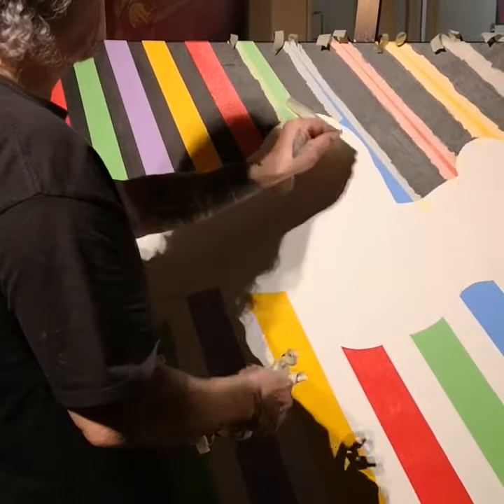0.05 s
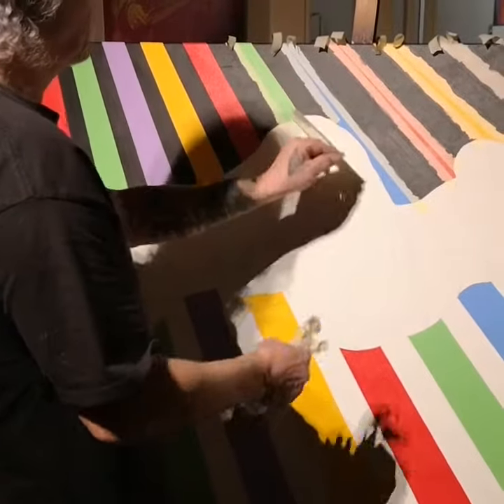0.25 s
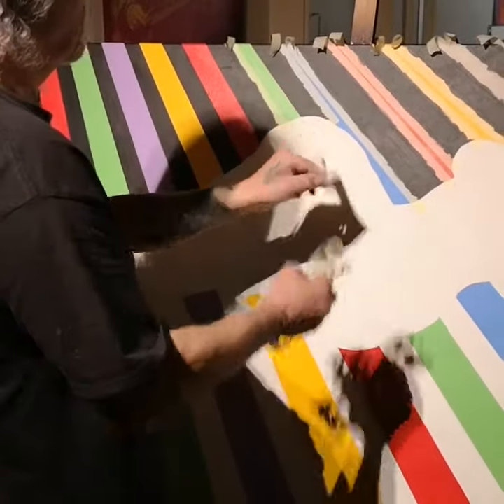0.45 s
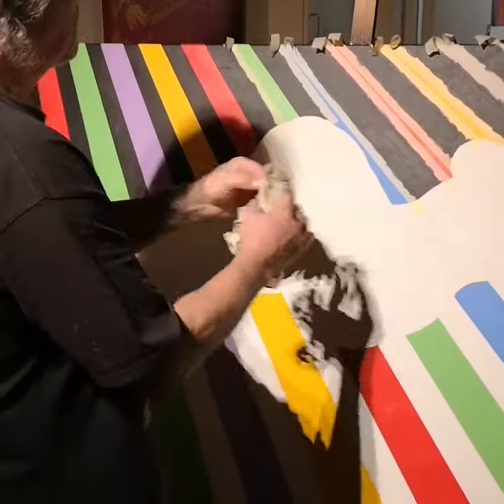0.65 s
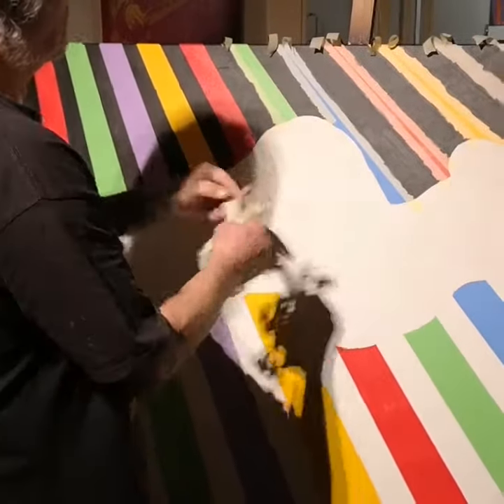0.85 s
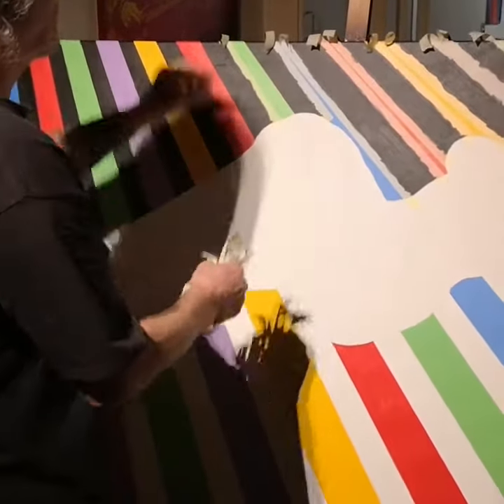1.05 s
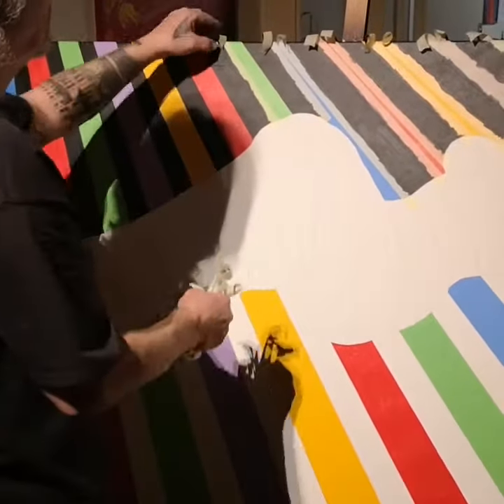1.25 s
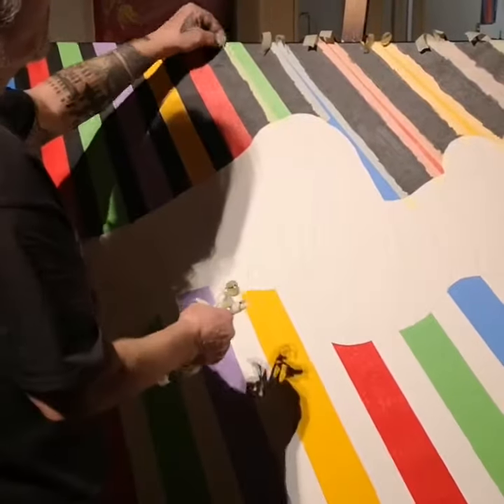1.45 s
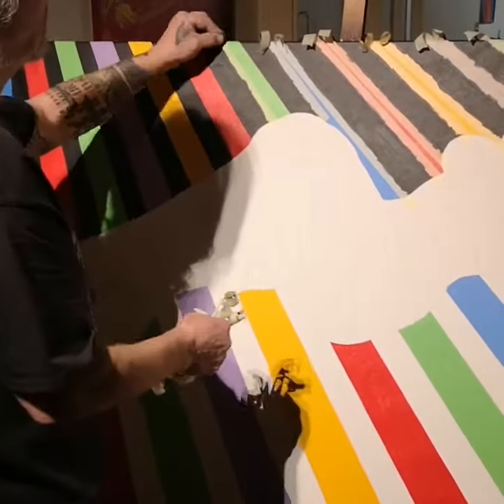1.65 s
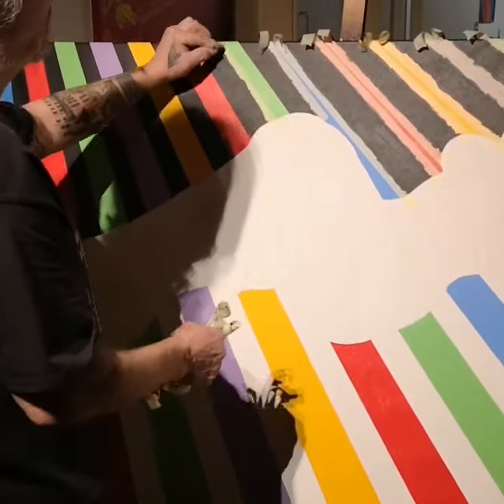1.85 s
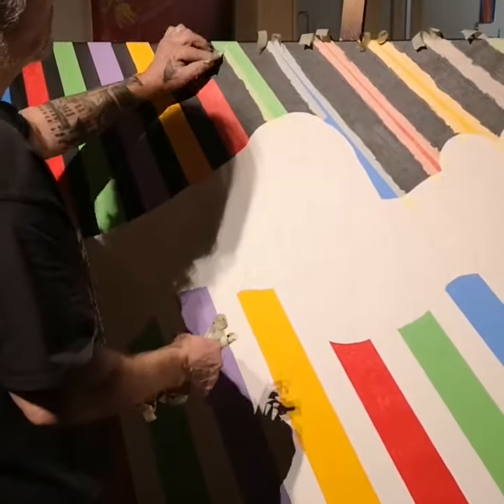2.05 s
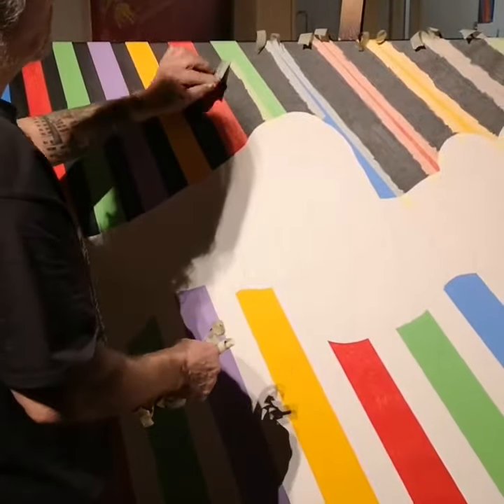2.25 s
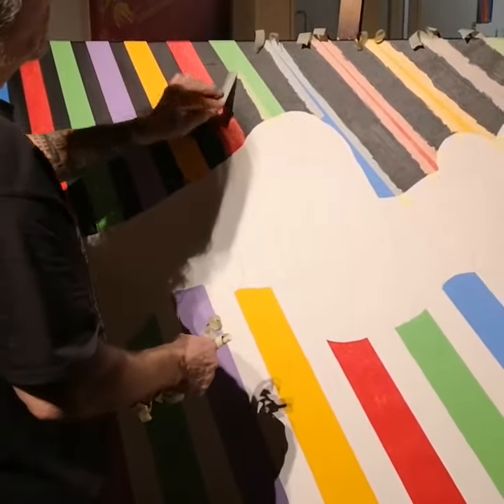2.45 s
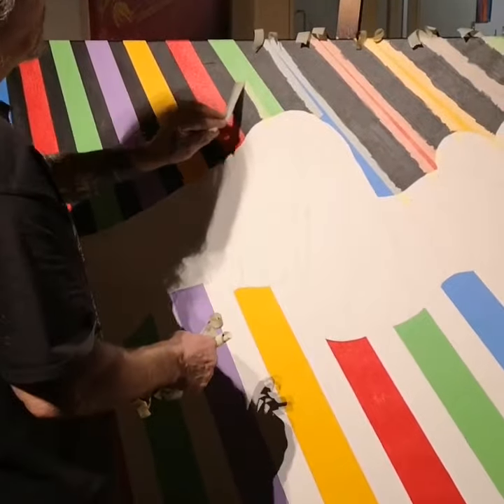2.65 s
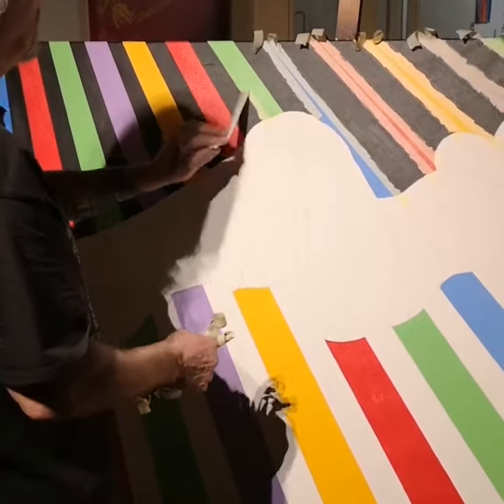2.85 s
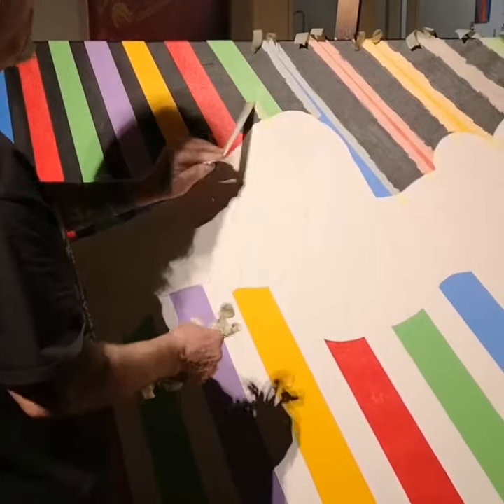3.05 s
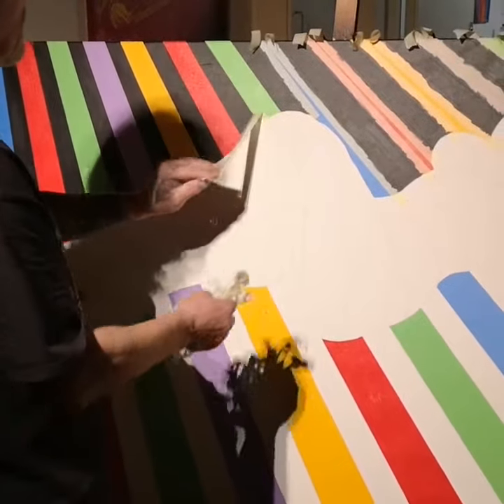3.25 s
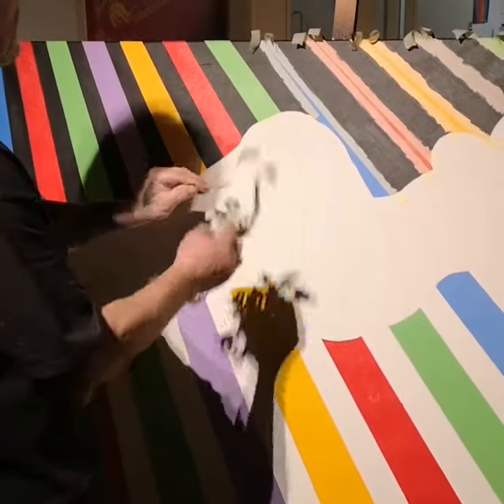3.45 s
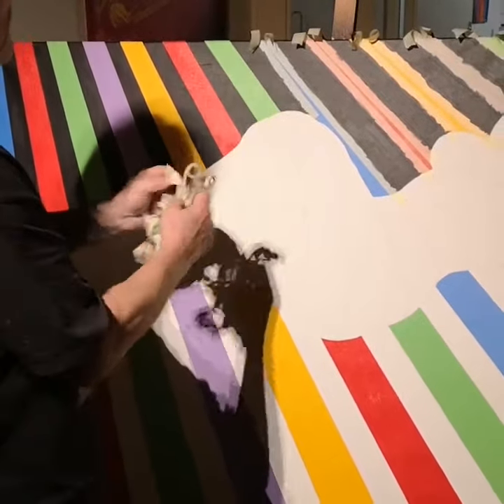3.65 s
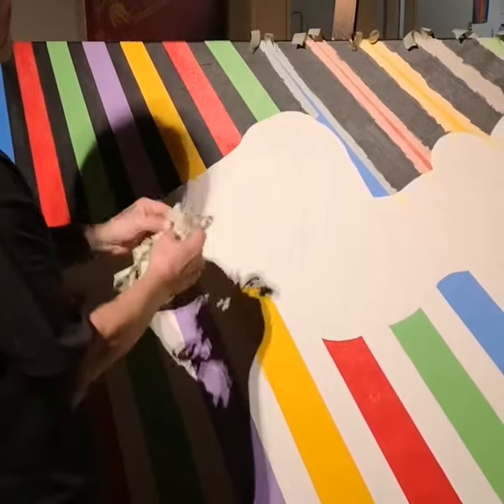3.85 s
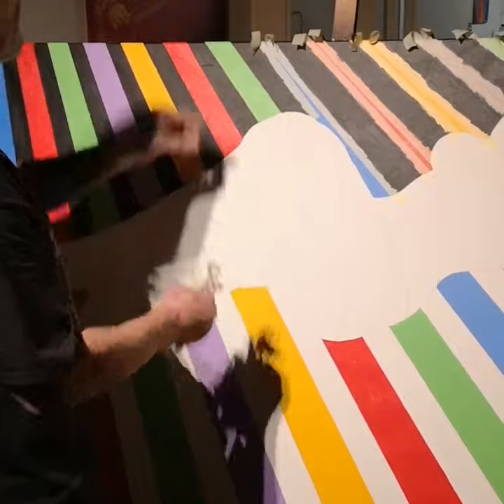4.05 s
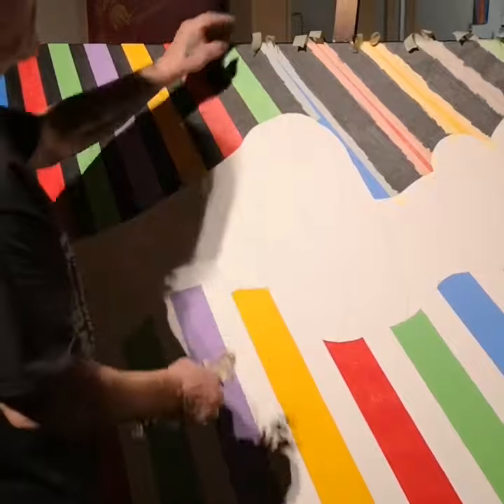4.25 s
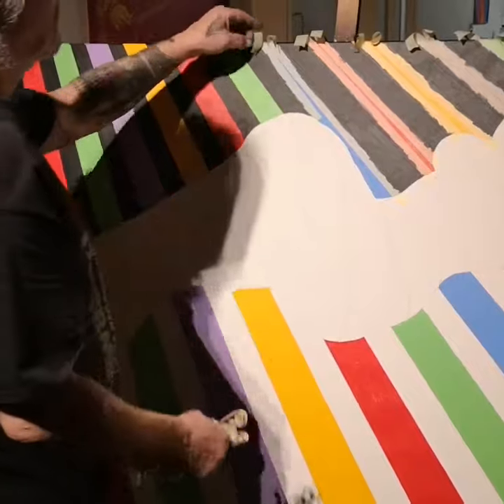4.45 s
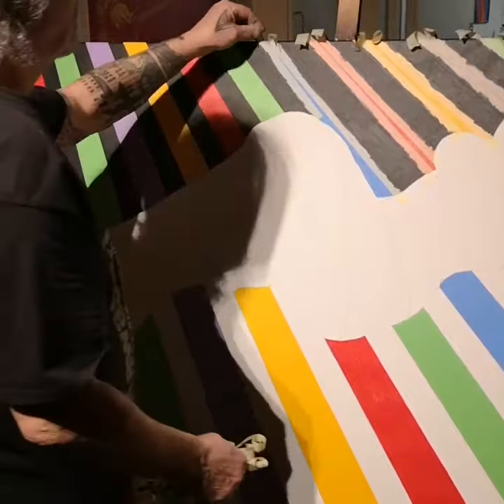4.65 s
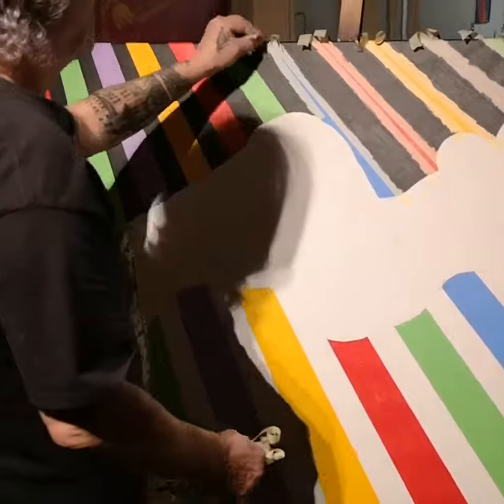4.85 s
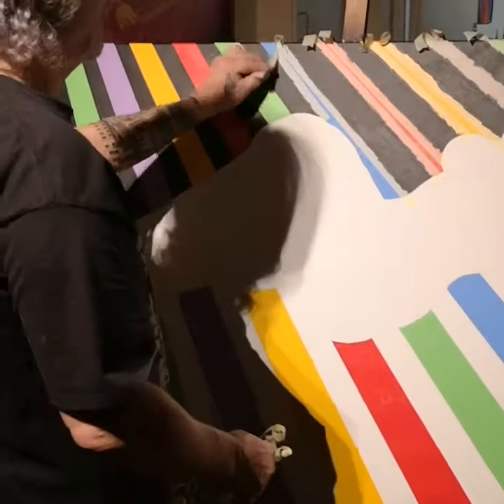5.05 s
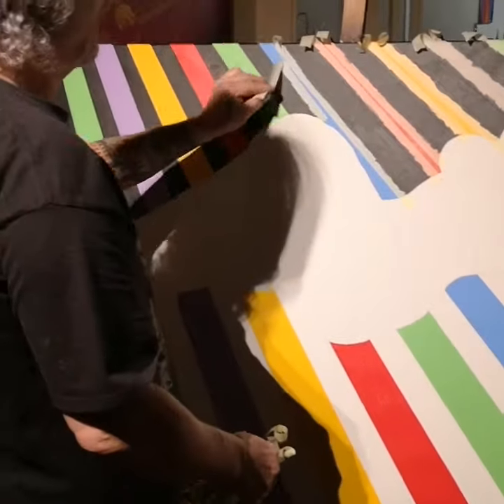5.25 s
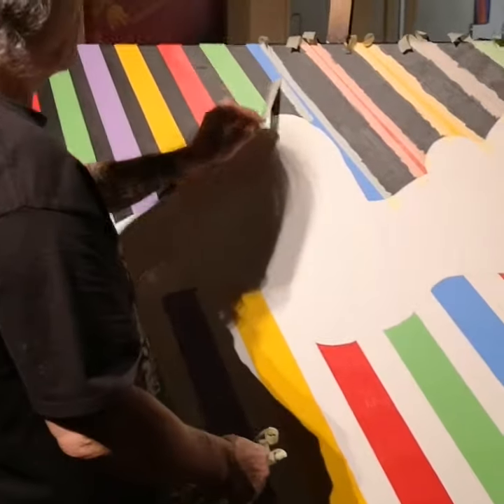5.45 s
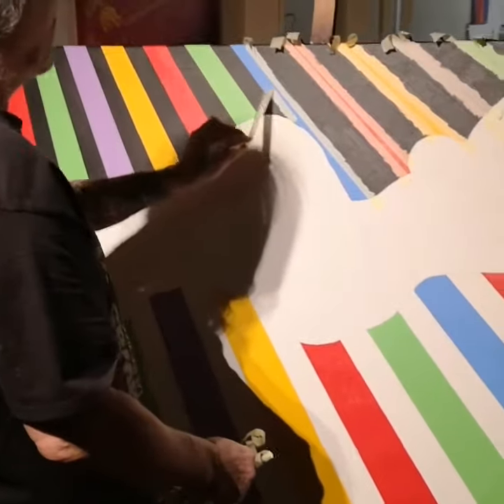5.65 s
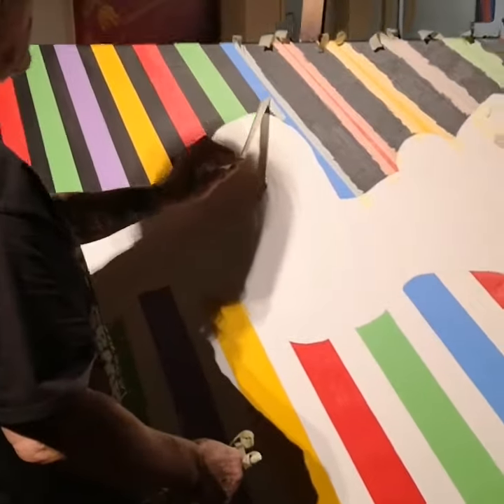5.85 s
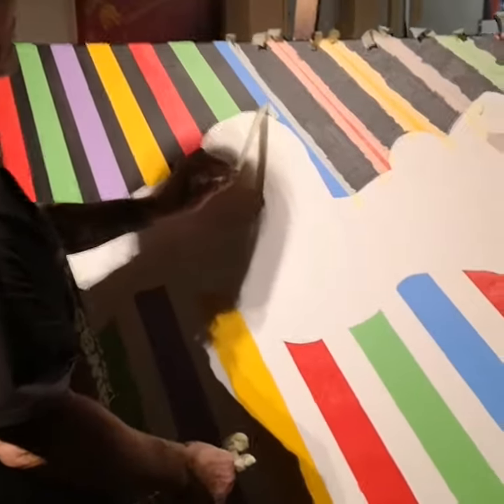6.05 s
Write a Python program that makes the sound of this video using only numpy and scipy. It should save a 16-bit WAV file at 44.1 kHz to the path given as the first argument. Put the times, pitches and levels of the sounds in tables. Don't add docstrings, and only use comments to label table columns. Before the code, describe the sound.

Close, bright tearing of sticky tape from a taut painted canvas, drum-like thumps beneath, paused twice while fingers lightly crumple the loose strips.

```python
import sys
import numpy as np
from scipy import signal
from scipy.io import wavfile
from scipy.ndimage import uniform_filter1d

SR = 44100
rng = np.random.default_rng(int(sys.argv[2]) if len(sys.argv) > 2 else 0)


def dump(signal):
    limited = np.clip(np.atleast_2d(signal).T, -1, 1)
    pcm = np.round(limited * 32767).astype(np.int16)
    wavfile.write(sys.argv[1], SR, pcm)


def natural_amplitude(level_db):
    exponent = np.asarray(level_db, float) / 20
    return 10 ** exponent


N = 269010


def evened(x):
    return x / np.sqrt(np.mean(x ** 2) + 1e-20)


def read(points, hz):
    f, value = np.transpose(points)
    return np.interp(np.log(hz + 1), np.log(f + 1), value)


def colour(x, points):
    gain_db = np.maximum(read(points, abs(np.fft.fftfreq(4096, 1 / SR))), -100)
    log_gain = np.log(natural_amplitude(gain_db))
    taps = np.fft.ifft(np.exp(np.conj(signal.hilbert(log_gain)))).real[:2048]
    return signal.oaconvolve(x, taps)[:len(x)]


def fading(x, fade_s):
    return signal.lfilter([1], [1, -np.exp(-1 / (fade_s * SR))], x)


def resonate(x, hz, width_hz):
    turn = np.exp(2j * np.pi * np.cumsum(hz * np.ones(len(x))) / SR)
    r = np.exp(-np.pi * width_hz / SR)
    return 2 * (turn * signal.lfilter([1 - r], [1, -r], x / turn + 1e-18)).real


def ring(x, modes):
    t = np.arange(SR // 3) / SR
    response = sum(natural_amplitude(db - 60 * t / t60) * np.sin(2 * np.pi * hz * t) for hz, db, t60 in modes)
    return signal.oaconvolve(x, response)[:N]


def per_sample(curve):
    return np.interp(np.arange(N) / 32, np.arange(len(curve)), curve)


def stroke_db(start, swell, length, peak_db, creep_db_s, bite_db, sag_db_s, release_db_s):
    linger_db, linger_db_s = 16, 160
    u = np.arange(0, N + 32, 32) / SR - start[:, None]
    swell, length = np.maximum(swell, 1e-3)[:, None], length[:, None]
    rise = bite_db * np.clip(1 - u / swell, 0, 1) - creep_db_s * np.maximum(-u, 0)
    after = np.maximum(u - length, 0)
    release = np.minimum(release_db_s * after, linger_db + linger_db_s * after)
    fall = sag_db_s * np.maximum(u - swell, 0) + release
    return np.maximum(peak_db[:, None] + rise - fall, -140)


# hz, level_db (per Hz)
AIR_SPECTRUM = [(8.8, -43), (15, 2.5), (32, -6.5), (49, -17), (102, -16), (244, -28), (282, -15),
                (389, -30.5), (505, -35.5), (877, -32), (1440, -35), (1570, -30.5), (1710, -31),
                (6330, -41), (15600, -50.5)]
# hz, likeness (0 to 1)
AIR_LIKENESS = [(60, 0.99), (200, 0.81), (350, 0.19), (520, 0.02), (1000, 0.038), (1400, 0.64),
                (2000, 0.042), (15000, .05)]


def room_tone():
    air_db, fan_db = -63, -84.5
    frames, hz = N // 512 + 6, np.fft.rfftfreq(2048, 1 / SR)
    a, b, c, d, patches = rng.standard_normal((frames, 1025, 5)).T
    patches = evened(uniform_filter1d(uniform_filter1d(patches, 20, 0), 8, 1))
    same = np.clip(read(AIR_LIKENESS, hz), -1, 1)[:, None]
    left = a + 1j * b
    z = np.array([left, same * left + np.sqrt(1 - same ** 2) * (c + 1j * d)])
    z *= natural_amplitude(read(AIR_SPECTRUM, hz)[:, None] + 0.14 * patches)
    air = evened(signal.istft(z, nperseg=2048, noverlap=1536)[1][:, :N])
    fan = evened(resonate(rng.standard_normal(N), 240, width_hz=1.9))
    return natural_amplitude(air_db) * air + natural_amplitude(fan_db) * fan


# start_s, length_s, level_db, pitch_hz
SQUEAKS = [
    (4.98, 0.18, -74.5, 1295),
    (1.05, 0.48, -79, 360),
]


def squeak():
    t, noise = np.arange(N) / SR, rng.standard_normal(N)
    total = np.zeros(N)
    for start, length, level_db, hz in SQUEAKS:
        swell = np.sin(np.pi * np.clip((t - start) / length, 0, 1)) ** .5
        total += natural_amplitude(level_db) * swell * evened(resonate(noise, hz, width_hz=55))
    return total


def clicks(per_s, spread_db):
    return natural_amplitude(spread_db * np.minimum(rng.exponential(1, N), 4)) * (rng.random(N) < per_s / SR)


def stutter(per_s, ms, depth):
    return 1 + depth * evened(fading(clicks(per_s, spread_db=-0.5), ms / 1000))


def glue(snaps):
    threads = evened(clicks(9000, spread_db=2.0) * rng.choice([-1., 1.], N))
    burst = 1 + .9 * evened(fading(snaps, 0.002))
    return threads * stutter(41, ms=13.0, depth=0.12) * burst


# hz, level_db (per Hz)
FIZZ_SPECTRUM = [(2710, -36.5), (4600, -9), (4670, -12.5), (5300, -7.5), (6210, -6.5), (7800, -1.5),
                 (9910, -6), (12500, -23.5), (14500, -17), (15500, -21)]


def glue_fizz(threads):
    return evened(colour(threads, FIZZ_SPECTRUM))


# hz, level_db (per Hz)
STRIP_SPECTRUM = [(600, -41), (1000, -9.5), (1600, -1.5), (2700, 0), (4100, -0.5), (4800, -12), (5600, -3),
                  (7200, -45.5)]


def ringing_strip(threads, strip_hz, ring_db):
    broad = evened(colour(threads, STRIP_SPECTRUM))
    tone = resonate(resonate(broad, strip_hz, width_hz=850), strip_hz, width_hz=850)
    return (broad + natural_amplitude(ring_db) * evened(tone)) / np.sqrt(1 + natural_amplitude(2 * ring_db))


# start_s, length_s, fizz_db, paper_db (over fizz), paper_hz
FLICKS = [(0.82, .005, -67, -4, 2200), (0.828, .01, -61, -17, 2300), (0.896, 0.012, -63.5, -2.5, 2300),
          (0.92, 0.021, -59, 0, 1750), (0.967, 0.022, -63.5, 10, 2700), (0.977, .04, -64.5, -3, 1750),
          (1.226, 0.011, -66.5, -5, 2250), (1.983, 0.094, -50, 0.5, 2940), (3.773, 0.018, -57.5, -8, 2600),
          (3.864, .01, -68, 5, 2600), (3.876, .012, -60, -1, 2600), (3.887, 0.098, -57.5, -2, 2500),
          (4.069, .04, -62, 2, 1920), (4.377, .012, -62.5, 1, 2200)]
# peak_s, length_s, fizz_db, paper_db (over fizz), paper_hz
SQUEEZES = [(1.041, 0.004, -59.5, 2.5, 1840), (1.55, 0.026, -82, -3, 1900), (1.671, .03, -67, -7, 3000),
            (1.704, 0.034, -69.5, -1.5, 3140), (2.12, 0.087, -61.5, -2.5, 3170),
            (4.137, 0.0022, -50, -4, 1740), (4.275, .012, -66, -4, 2980), (4.32, .03, -65, -5.5, 2300),
            (4.389, 0.0089, -56.5, 0.5, 4100), (4.45, .05, -74.5, -10, 3900),
            (4.896, 0.021, -60.5, -6, 3050), (5.195, 0.011, -57, -1.5, 3100)]


def fingers():
    start, length, fizz_db, paper_db, paper_hz = np.transpose(np.concatenate([FLICKS, SQUEEZES]))
    creep_db_s = np.repeat([2500, 480], [len(FLICKS), len(SQUEEZES)])[:, None]
    levels = stroke_db(start, 0 * start, length, fizz_db, creep_db_s,
                       bite_db=0.5, sag_db_s=90, release_db_s=650)
    now = levels.argmax(0)
    return per_sample(natural_amplitude(levels.max(0))), per_sample(paper_db[now]), per_sample(paper_hz[now])


def touches():
    gain, paper_db, paper_hz = fingers()
    creases = clicks(180, spread_db=0.0)
    fizz = glue_fizz(glue(creases))
    paper = ringing_strip(glue(creases), paper_hz, ring_db=-5)
    return gain * (fizz + natural_amplitude(paper_db - .3) * paper)


# start_s, tick_db, spray_db
SLIPS = [(0.257, -34, -34), (0.397, -41, -33), (0.454, -38, -48), (0.818, -50, -66), (0.835, -54, -57),
         (0.9, -50, -62), (0.923, -50, -41), (0.988, -49, -42), (1.041, -39, -45.5), (1.705, -48, -51),
         (1.986, -34, -36.5), (2.19, -33, -56), (3.572, -41, -52), (2.268, -27.5, -31.5), (2.36, -39, -30),
         (2.387, -28, -30), (2.531, -37, -42), (2.767, -45, -54), (2.932, -41, -35), (3.098, -31, -51),
         (3.254, -34, -49), (3.522, -42, -34.5), (3.773, -43.5, -61), (3.889, -34.5, -37.5),
         (4.14, -33.5, -34), (4.381, -39, -54), (5.208, -28, -45), (5.51, -38, -32), (5.777, -35, -41),
         (5.821, -47, -37)]


def slips():
    start, tick_db, spray_db = np.transpose(SLIPS)
    at = np.round(start * SR).astype(int)
    ticks, fizz, paper = np.zeros((3, N))
    ticks[at] = -natural_amplitude(tick_db + 5.0)
    fizz[at] = natural_amplitude(spray_db - 8)
    paper[at] = natural_amplitude(spray_db - 13.5)
    dying = np.exp(-np.arange(2000) / (.005 * SR))
    spray = np.zeros(N)
    for starts, spectrum in ((fizz, FIZZ_SPECTRUM), (paper, STRIP_SPECTRUM)):
        noise = evened(colour(rng.standard_normal(N), spectrum))
        spray += signal.oaconvolve(starts, dying)[:N] * noise
    tick_spectrum = [(300, -22), (1500, -7), (4000, 12.5), (8000, 10), (13000, -12), (16000, -12.0)]
    return spray, colour(ticks, tick_spectrum)


# start_s, swell_s, length_s, fizz_db
FIRST_TUGS = [(0.0, 0.0017, 0.14, -37.5), (0.137, 0.0045, .025, -41.5), (0.162, .004, .02, -40),
              (0.186, 0.0095, 0.056, -40.5), (0.263, .004, 0.025, -44.5), (0.289, 0.0026, 0.025, -46.5),
              (0.334, 0.0063, .04, -48.5), (0.4, .003, 0.037, -56.5), (.455, .003, 0.035, -52),
              (0.491, 0.029, 0.051, -44.5), (0.56, .003, 0.027, -54)]
SECOND_TUGS = [(2.187, .008, .022, -52), (2.215, 0.029, 0.051, -49.5), (2.267, 0.0021, 0.065, -46),
               (2.359, 0.0034, 0.017, -45), (2.387, 0.016, 0.076, -42.5), (2.529, 0.0032, 0.071, -43.5),
               (2.574, 0.007, 0.11, -42.5), (2.685, 0.0077, 0.078, -47), (2.766, .004, 0.1, -47.5),
               (2.813, 0.017, 0.078, -43.5), (2.931, 0.003, 0.078, -50), (3.023, 0.0063, 0.052, -49.5),
               (3.097, .004, 0.051, -48.5), (3.14, 0.0081, 0.13, -47), (3.254, .004, 0.084, -46.5),
               (3.299, 0.024, 0.075, -47.5), (3.384, 0.064, 0.097, -45.5), (3.524, .004, 0.08, -49),
               (3.572, 0.029, 0.042, -44)]
THIRD_TUGS = [(5.205, .004, 0.042, -46.5), (5.238, 0.0072, 0.065, -42), (5.375, 0.025, .035, -54),
              (5.41, 0.062, 0.15, -47.5), (5.508, 0.0031, 0.072, -40), (5.549, 0.012, 0.094, -38),
              (5.641, 0.013, 0.12, -42), (5.745, 0.047, 0.042, -48), (5.819, 0.0084, .07, -48),
              (5.9, 0.01, 0.062, -50), (5.983, 0.062, 0.083, -52.5), (6.08, 0.022, .03, -47)]
# time_s, canvas_lift_db, strip_tension_db
LIFT = [
    [(0, -9, -3.5), (.25, -8.5, -5.5), (.4, -4, -5), (.52, -1, -2.5), (.6, -1, -2.5)],
    [(2.19, -31, 4), (2.27, -19.5, 5.5), (2.4, -10, 0), (2.55, -9, 1), (2.72, -3.5, -1), (2.9, -3, 0.5),
     (3.15, -0.5, 1), (3.45, 0, 0.5), (3.62, 0, 3.5)],
    [(5.2, -19.5, 0.5), (5.35, -16, 1), (5.45, -5, -1), (5.6, -7, -3.5), (5.75, -2.5, -2.5), (5.9, -0.5, 0),
     (6.1, 0, -1.5)],
]
STRIP_STARTS = [
    -0.94,
    2.17,
    5.2,
]
# time_s, drum_db
TEAR_OFFS = [
    (.52, 4.5),
    (3.585, 4.5),
    (5.65, 1.5),
]


def peeling_edge():
    t = np.arange(N) / SR
    tugs = np.transpose(np.concatenate([FIRST_TUGS, SECOND_TUGS, THIRD_TUGS]))
    levels = stroke_db(*tugs, creep_db_s=3000, bite_db=-3.5, sag_db_s=53.5, release_db_s=748)
    edge = per_sample(natural_amplitude(levels.max(0)))
    canvas_lag_s = 0.0099
    r = np.exp(-1 / (canvas_lag_s * SR))
    late_power = signal.lfilter([1 - r], [1, -r], edge ** 2, zi=[edge[400] ** 2])[0]
    late_db = 10 * np.log10(late_power / edge ** 2)
    s, lift_db, strip_db = np.transpose(np.concatenate(LIFT))
    lift_db, strip_db = np.interp(t, s, lift_db), np.interp(t, s, strip_db)
    short_hz, long_hz, grow_s = 3220, 2050, 0.48
    since = t - np.array(STRIP_STARTS)[:, None]
    grown = 1 - np.exp(-np.where(since < 0, np.inf, since).min(0) / grow_s)
    strip_hz = short_hz + (long_hz - short_hz) * grown
    spring_db = sum(db * np.exp(-((t - at) / .035) ** 2) for at, db in TEAR_OFFS)
    drum_db = spring_db + 5 + 1.15 * lift_db + late_db
    return edge, strip_db, lift_db + late_db, drum_db, strip_hz


def uneven_pulses(per_s, jitter, spread_db):
    wander = evened(uniform_filter1d(rng.standard_normal(N), 300))
    turns = np.floor(np.cumsum(per_s * np.exp(jitter * wander)) / SR)
    sizes = natural_amplitude(spread_db * np.clip(rng.standard_normal(N), -2, 2))
    return sizes * (np.diff(turns, prepend=0) > 0)


# hz, level_db (per Hz)
SNAP_SPECTRUM = [(210, -61), (350, -23), (682, 8.5), (953, -6), (1110, 6.5), (1410, 0.5), (1900, 4),
                 (5000, -39.5), (6500, -38), (11000, -120)]
# pitch_hz, level_db, t60_s
WEAVE_MODES = [(436, 3, 0.15), (549, -3, 0.17), (684, 1.5, 0.05), (865, -7, 0.19), (1179, 0.5, 0.049),
               (1824, 14, 0.057)]


def canvas_rattle(threads, snaps):
    dip = -fading(snaps, .00016)
    band = signal.butter(2, [90, 7000], "band", fs=SR, output="sos")
    dip = evened(signal.sosfilt(band, dip))
    weave = evened(ring(dip + 2.06 * threads, WEAVE_MODES))
    return dip, evened(colour(threads, SNAP_SPECTRUM)) + natural_amplitude(-3.5) * weave


# pitch_hz, level_db, t60_s
DRUM_MODES = [(66.4, -27.5, 0.033), (105.6, -10.5, 0.49), (130.3, -5.5, 0.36), (167, -3, 0.047),
              (189.7, 8.5, 0.06), (214.8, 3.5, 0.087), (269.6, 0, 0.27), (295, -28, 0.35)]


def canvas_drum(snaps, level):
    push = (0.42 * rng.standard_normal(N) - evened(snaps - snaps.mean())) * level
    drum = ring(push, DRUM_MODES)
    drum *= np.sqrt(np.mean(level ** 2) / np.mean(drum ** 2)) * natural_amplitude(2.0)
    sway = evened(resonate(rng.standard_normal(N), 7, width_hz=25)) * uniform_filter1d(level, 3000)
    return drum + natural_amplitude(-6.5) * sway


def pulls():
    gain, strip_db, snap_db, drum_db, strip_hz = peeling_edge()
    snaps = uneven_pulses(210, jitter=.6, spread_db=4.0)
    threads = glue(snaps)
    fizz = glue_fizz(threads)
    ring_db = np.clip(-14.5 - 0.65 * snap_db, -15, 5)
    strip = ringing_strip(glue(snaps), strip_hz, ring_db)
    dip, rattle = canvas_rattle(threads, snaps)
    crack = natural_amplitude(-4) * glue_fizz(-snaps)
    rip = gain * (fizz + natural_amplitude(strip_db - 1.5) * strip + natural_amplitude(snap_db - 5.0) * rattle)
    rip = rip + canvas_drum(snaps, gain * natural_amplitude(drum_db))
    return rip, gain * (natural_amplitude(snap_db) * dip + crack)


# hz, t60_s
STUDIO_DECAY = [(100, 0.32), (260, 0.14), (700, 0.45), (1840, 0.26), (4850, 0.2), (12000, 0.16)]


def studio(x):
    taps = np.zeros((3, 2, SR // 2))
    at = np.arange(30, SR // 2 - 20, 20) + rng.integers(0, 20, (3, 2, (SR // 2 - 31) // 20))
    np.put_along_axis(taps, at, rng.choice([-1., 1.], at.shape), 2)
    hz, t, z = signal.stft(taps, SR, nperseg=512)
    shared = 1 / (1 + (hz[:, None] / 280) ** 4)
    z = shared * z[:, :1] + (1 - shared) * z
    decay = natural_amplitude(-5.5 - 60 * t / read(STUDIO_DECAY, hz)[:, None])
    walls = signal.istft(z * decay, SR, nperseg=512)[1][..., :SR // 2]
    tails = walls + taps * natural_amplitude(-60 * np.arange(SR // 2) / SR / 0.026)
    tails = tails / np.linalg.norm(tails[0, 0])
    turn = 2 * np.pi * (5.3 * np.arange(N) / SR + np.arange(3)[:, None] / 3)
    turns = np.sqrt(2 / 3) * np.cos(turn) * x
    return signal.oaconvolve(turns[:, None], tails, axes=2)[:, :, :N].sum(0)


# hz, left_over_right_db
PORTS = [(60, 1.3), (300, -1.5), (520, 4.5), (800, -1), (1040, 5), (1500, 1.5), (2400, 3), (3800, 7),
         (4800, -1.5), (6900, 3.5), (7900, 3.5), (9000, 4.5), (10300, -4), (12500, 0)]


def scene():
    rip, snaps = pulls()
    spray, ticks = slips()
    tape = rip + touches() + spray + squeak()
    snaps = snaps + ticks
    beam = natural_amplitude(-3) * tape + snaps
    direct = np.array([beam, np.roll(beam, 4)])
    high = signal.butter(4, 260, "high", fs=SR, output="sos")
    thin = signal.sosfilt(high, tape + .5 * snaps)
    heard = direct + natural_amplitude(-1.5) * studio(thin)
    hz, db = np.transpose(PORTS)
    left = colour(heard[0], np.transpose([hz, db / 2]))
    right = colour(heard[1], np.transpose([hz, -db / 2]))
    return np.array([left, right]) + room_tone()


def top_cut(x):
    return signal.sosfilt(signal.butter(12, 15720, fs=SR, output="sos"), x)


def record(dry):
    blocked = signal.sosfilt(signal.butter(1, 8, "high", fs=SR, output="sos"), dry)
    top_edge = signal.firwin(301, 15350, window=("kaiser", 5), fs=SR)
    mix = signal.oaconvolve(blocked, top_edge[None], "same") - .0004
    return top_cut(mix)


dry = scene()
out = record(dry)
dump(out)
```